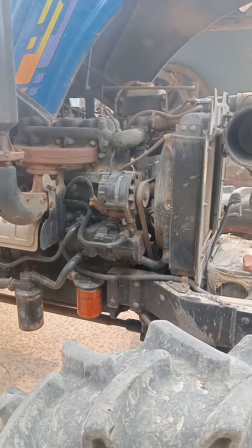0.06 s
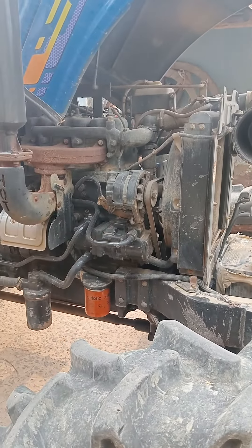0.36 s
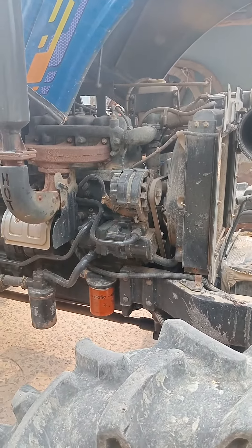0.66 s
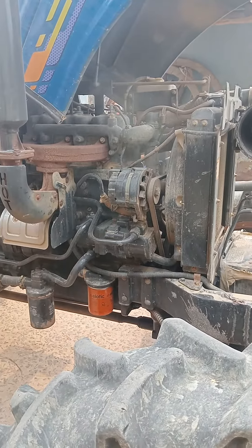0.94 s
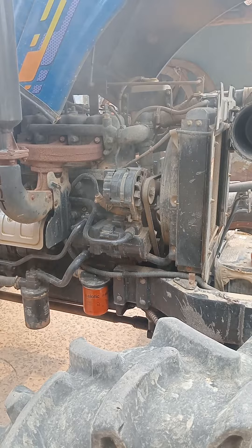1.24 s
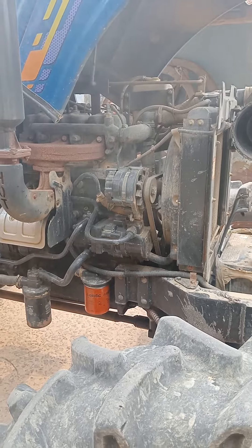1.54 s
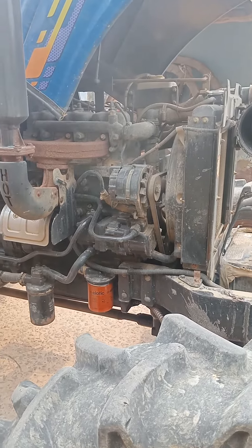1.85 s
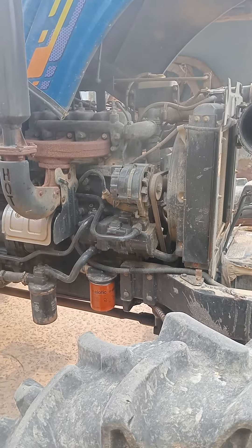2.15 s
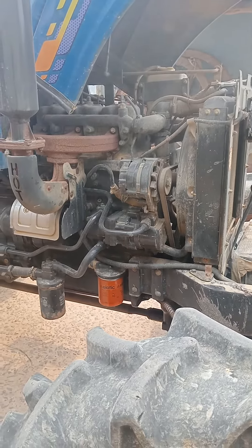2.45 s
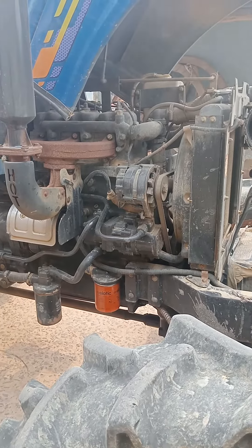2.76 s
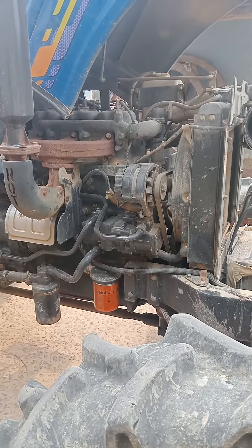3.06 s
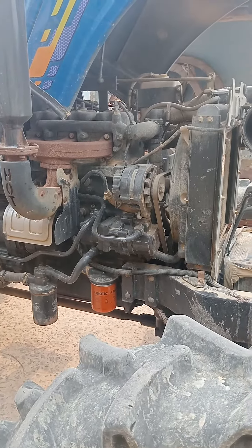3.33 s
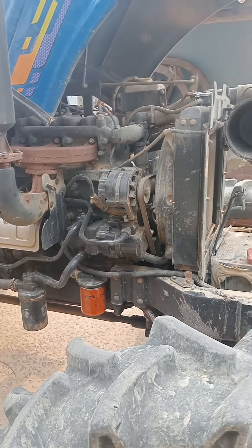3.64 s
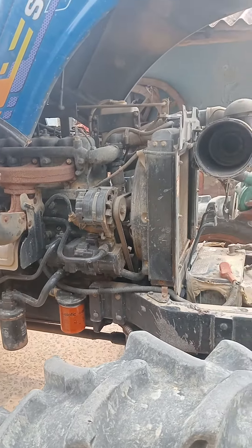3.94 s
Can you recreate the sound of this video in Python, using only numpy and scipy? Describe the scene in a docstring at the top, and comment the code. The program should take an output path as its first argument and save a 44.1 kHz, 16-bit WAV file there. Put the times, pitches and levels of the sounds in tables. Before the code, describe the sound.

Close by in the open air, an electric blower whines continuously while blowing dust off a tractor engine. The air hisses on metal and whistles hollowly in gaps, dips into a low flutter, then roars again.

```python
"""A high, steady whine over rushing air: an electric blower, flat out, dusts a tractor engine outdoors.
The ten-blade impeller makes the whine; air churning in the housing makes the rush around it.
The jet sweeps over the metal: it roars and hisses on edges, whistles hollowly in gaps, and for a
moment turns to a low, dull flutter. Short echoes off the engine comb the jet noise."""
import sys
import numpy as np
from scipy import signal
from scipy.fft import rfft, irfft
from scipy.io import wavfile
from scipy.ndimage import map_coordinates

SR = 44100
rng = np.random.default_rng(int(sys.argv[2]) if len(sys.argv) > 2 else 0)


def int16_out(signal):
    """Quantize to a 16-bit WAV file."""
    q = np.round(np.clip(np.atleast_2d(signal).T, -1, 1) * 32767)
    wavfile.write(sys.argv[1], SR, q.astype(np.int16))


N = 176400
TIME_S = np.arange(N) / SR
BIN_HZ = np.arange(N // 2 + 1) * SR / N

# Each row: time in seconds, blade-passing frequency in Hz.
BLADE_HZ = [(0, 2262), (.2, 2260), (.45, 2256), (.8, 2267), (1.25, 2257), (1.7, 2266), (2.05, 2265),
            (2.5, 2267.5), (2.8, 2264), (3.3, 2265), (3.8, 2258), (4, 2260)]
# Blade harmonics 1 to 3. Each row: time in seconds, level in dB before trim.
WHINE_DB = [(0.0, -14.5), (0.26, -18), (0.34, -17), (0.41, -19.5), (0.54, -15), (0.71, -19), (1.01, -14),
            (1.17, -15), (1.26, -13.5), (1.41, -15), (1.44, -19), (1.55, -21.5), (1.63, -16.5), (1.74, -17),
            (1.83, -14), (2.05, -16), (2.42, -15), (2.51, -18.5), (3.27, -16.5), (3.66, -18), (3.74, -19),
            (3.87, -18), (4.0, -22.5)]
SECOND_DB = [(0, -35), (.07, -30.5), (.16, -32.5), (.45, -31.5), (.57, -35), (.62, -39), (.82, -50),
             (.98, -39.5), (1.12, -35), (1.2, -45.5), (1.3, -34), (1.4, -58), (1.5, -35), (1.7, -38.5),
             (1.9, -33.5), (2.4, -45.5), (2.6, -35.5), (2.87, -29.5), (2.93, -40), (3.25, -42), (3.45, -31),
             (3.65, -38.5), (3.76, -54), (4, -46)]
THIRD_DB = [(0, -45), (.12, -48), (.22, -37), (.4, -45), (.6, -44), (.85, -54), (1.2, -56), (1.5, -45),
            (1.9, -41.5), (2.4, -52), (2.48, -41), (2.85, -34.5), (3.0, -42), (3.55, -44), (3.8, -57),
            (4, -51)]
# Each row: multiple of the shaft rate, early level in dB, late level in dB.
SHAFT_TONES = [(1, -65.5, -46), (2, -46.5, -55), (3, -49, -46.5), (4, -44, -50), (6, -46.5, -52),
               (11, -36, -41), (12, -45, -47)]
# Each row: frequency in Hz at mean speed, level in dB.
MOTOR_TONES = [(2615, -46), (2814, -50)]

def impeller(blades=10, speed_jitter=0.000594, trim_db=1.44):
    """Passing blades whine, shaken by the inflow, over weak shaft and motor tones."""
    blade_hz = curve(BLADE_HZ) * (1 + speed_jitter * wander(9.9))
    shaft_rad = 2 * np.pi * np.cumsum(blade_hz / blades) / SR
    blade_rad = blades * shaft_rad
    out = undb(curve(WHINE_DB) + trim_db + 0.56 * wander(33)) * np.sin(blade_rad)
    for harmonic, levels, overtone_trim_db in ((2, SECOND_DB, 1), (3, THIRD_DB, 0.5)):
        gain = undb(curve(levels) + overtone_trim_db + 2.15 * wander(23))
        out += gain * np.sin(harmonic * blade_rad + 0.36 * wander(30))
    # The shaft tones change balance as the blower moves.
    move_mid_s, move_length_s = 3.01, 0.7
    moved = np.clip((TIME_S - move_mid_s) / move_length_s + 0.5, 0, 1)
    for order, early_db, late_db in SHAFT_TONES:
        gain = undb(early_db + moved * (late_db - early_db) + 1.9 * wander(7.7))
        out += gain * np.sin(order * shaft_rad + 0.45 * wander(12))
    for hz, db in MOTOR_TONES:
        out += undb(db) * np.sin(blade_rad * hz / blade_hz.mean() + 0.2 * wander(6))
    return np.sqrt(2) * out  # rms to peak


# Each row: frequency in Hz, relative density in dB.
HOUSING_SPECTRUM = [(1400, -14), (1600, -13), (1800, -5.5), (2050, -3), (2170, 3), (2330, 1.5), (2480, -1),
                    (2620, -6.5), (2800, -11), (3100, -6.5)]
# Each row: time in seconds, level in dB before trim.
HOUSING_DB = [(0, -21.5), (.6, -21.5), (.8, -24), (1.38, -25.5), (1.52, -21), (1.9, -22.5), (2.3, -21),
              (2.5, -22), (3.3, -21), (3.8, -22), (4, -21.5)]

def housing():
    """Air churns in the fan housing, loudest around the blade tone."""
    return turbulence(HOUSING_SPECTRUM, HOUSING_DB, trim_db=-4.5, flicker_db=1.3)


# Each row: frequency in Hz, relative density in dB.
HISS_SPECTRUM = [(2200, -25), (2750, 1), (3150, -4.5), (3700, -2), (4150, 4.5), (4600, 3.5), (5350, 2),
                 (5850, 2), (6200, 1.5), (6600, 2), (7100, -7.5), (8000, -8)]
SIZZLE_SPECTRUM = [(6000, -40), (7000, -11), (7450, -5.5), (8000, -9.5), (8550, -1.5), (9000, -2.5),
                   (9450, 1.5), (10000, -5), (10600, -9), (11200, -14), (12500, -17), (15500, -19.5)]
FLUTTER_SPECTRUM = [(25, -30), (50, -32), (100, -18), (150, -12), (205, -2), (260, -5), (325, 6),
                    (410, -4.5), (550, 1.5), (750, -26), (1100, -35)]
ROAR_SPECTRUM = [(400, -21), (570, -17), (670, -6.5), (750, -6.5), (850, 2), (1020, -1), (1220, 2),
                 (1370, -6.5), (1500, -13.5), (1900, -10), (2600, -42)]
# Each row: time in seconds, level in dB before trim.
HISS_DB = [(0, -33), (.6, -32.5), (.8, -38), (1.35, -38.5), (1.6, -33.5), (1.85, -33), (2.1, -34),
           (2.4, -33.5), (2.85, -33), (3.2, -36), (3.6, -34.5), (4, -35)]
SIZZLE_DB = [(0, -31.5), (.65, -32), (.76, -37), (1.1, -36.5), (1.44, -36.5), (1.51, -32), (1.66, -34),
             (1.76, -31.5), (2.3, -30.5), (3.04, -30.5), (3.4, -32.5), (3.78, -33), (4, -31.5)]
FLUTTER_DB = [(0, -41), (.55, -42), (.74, -34.5), (.81, -30.5), (.96, -35.5), (1.25, -36.5), (1.55, -35.5),
              (1.7, -41), (1.9, -43), (2.4, -42), (2.7, -42), (3.2, -41.5), (3.6, -42.5), (4, -40.5)]
ROAR_DB = [(0, -29.5), (.3, -28.5), (.46, -29.5), (.56, -27.5), (.69, -25.5), (.74, -33.5), (1.1, -34),
           (1.47, -34.5), (1.51, -26), (1.65, -29), (2.1, -29.5), (2.25, -31), (2.48, -30), (2.56, -26.5),
           (3.0, -27.5), (3.25, -29.5), (3.6, -30), (4, -32.5)]

def jet():
    """The jet hits the engine: low flutter, roar, and a hiss and sizzle that echo off the metal."""
    hiss = turbulence(HISS_SPECTRUM, HISS_DB, trim_db=2.5, flicker_db=0.57)
    sizzle = turbulence(SIZZLE_SPECTRUM, SIZZLE_DB, trim_db=-2, flicker_db=0.44)
    flutter = turbulence(FLUTTER_SPECTRUM, FLUTTER_DB, trim_db=1.5, flicker_db=0.9)
    roar = turbulence(ROAR_SPECTRUM, ROAR_DB, trim_db=-1, flicker_db=1.14)
    return flutter + roar + metal_echoes(hiss + sizzle)


# Each row: start in seconds, end in seconds, centre in Hz, width in Hz, level in dB.
GAP_CROSSINGS = [(0.18, .28, 843, 90, -28), (0.213, 0.375, 654, 120, -35.5), (.22, .45, 4160, 262, -36.5),
                 (0.37, 0.598, 853, 109, -33), (0.597, .71, 1260, 200, -24.5), (0.602, .7, 1690, 203, -33),
                 (0.784, 0.897, 207, 150, -39.5), (0.806, .93, 8370, 250, -44),
                 (.93, 1.4, 9320, 260, -43.5), (.9, 1.602, 184, 55, -47), (1.084, 1.27, 576, 279.8, -35.5),
                 (1.384, 1.463, 217, 129, -37), (1.49, 1.576, 1320, 170, -26.5),
                 (1.498, 1.627, 880, 139, -28.5), (1.5, 1.732, 1610, 250, -36),
                 (1.67, 2.124, 1150, 170, -31), (1.722, 1.9, 6000, 1100, -32.5),
                 (1.948, 2.197, 6400, 305, -37.5), (2.001, 2.347, 9700, 280.2, -41),
                 (2.42, 2.65, 4260, 260, -33.5), (2.537, 3.136, 687, 180, -36),
                 (2.58, 2.92, 9030, 350, -39.5), (2.68, 3.185, 4120, 210, -33),
                 (2.966, 3.394, 9530, 330, -37), (3.0, 4.0, 3240, 300, -37),
                 (3.22, 4.0, 5850, 219.9, -38.5), (3.25, 3.55, 10420, 250.4, -42),
                 (3.727, 3.93, 1920, 90, -32.5), (2.501, 3.1, 1820, 160, -38.5),
                 (2.2, 2.496, 327, 60, -44.5), (2.55, 3.653, 1580, 300, -43)]

def gap_whistles(fade_s=0.04):
    """A gap or edge rings hollowly while the jet crosses it."""
    hz = BIN_HZ + SR / N  # one bin up avoids 0 Hz
    out = np.zeros(N)
    for start_s, end_s, centre_hz, width_hz, db in GAP_CROSSINGS:
        detuning = (hz - centre_hz ** 2 / hz) / width_hz
        ring = shaped_noise(1 / (1 + detuning ** 2))
        inside_s = np.minimum(TIME_S - start_s, end_s - TIME_S)
        out += ring * undb(db) * np.clip(inside_s / fade_s + 0.5, 0, 1)
    return out


# Each row: mean delay in ms, gain in dB.
ECHO_PATHS = [(1.35, -16), (2.9, -15), (4.7, -15), (8.3, -16), (13, -19)]

def metal_echoes(air, drift_ms=0.11):
    """Engine and bonnet reflect the air noise; the paths drift as the nozzle moves."""
    out = air.copy()
    for delay_ms, db in ECHO_PATHS:
        lag_samples = (delay_ms + drift_ms * wander(1.1)) * SR / 1000
        out += undb(db) * map_coordinates(air, [np.arange(N) - lag_samples], order=3, mode="mirror")
    return out


def turbulence(colour, levels, trim_db, flicker_db, swell_db=0.57, swell_hz=4.15):
    """Coloured air noise; each third octave swells on its own and all flicker together."""
    octave = np.log2(np.maximum(BIN_HZ, 1))
    knot_hz, knot_db = np.array(colour, float).T
    knot_octave = np.log2(knot_hz)
    skirt_db = -40 * np.abs(octave - np.clip(octave, knot_octave[0], knot_octave[-1]))
    spectrum = rfft(rng.standard_normal(N)) * undb(np.interp(octave, knot_octave, knot_db) + skirt_db)
    air = np.zeros(N)
    for centre_octave in np.arange(12, 44) / 3:
        band = np.maximum(1 - 3 * np.abs(octave - centre_octave), 0)
        swell = np.interp(TIME_S * swell_hz, np.arange(64), rng.standard_normal(64))
        air += irfft(spectrum * band, N) * undb(swell_db * swell)
    air *= undb(flicker_db * wander(30))
    return unit_rms(air) * undb(curve(levels) + trim_db)


def wander(rate_hz):
    """Smooth random motion up to about rate_hz, rms 1."""
    return shaped_noise(1 / (1 + (BIN_HZ / rate_hz) ** 4))


def shaped_noise(bin_gains):
    """Filtered white noise, rms 1."""
    return unit_rms(irfft(rfft(rng.standard_normal(N)) * bin_gains, N))


def curve(table):
    """Join (seconds, value) rows with straight lines."""
    times_s, values = np.array(table, float).T
    return np.interp(TIME_S, times_s, values)


def unit_rms(x):
    """Scale to rms 1."""
    return x / np.sqrt(np.mean(x ** 2))


def undb(db):
    """Decibels to gain."""
    return 10 ** (db / 20)


def scene():
    """Blower and jet, close by in the open air; mono."""
    return (impeller() + housing() + metal_echoes(jet()) + gap_whistles())[None]


def record(dry, cutoff_hz=15550):
    """A steep low-pass cuts the top treble."""
    return signal.sosfilt(signal.ellip(10, 0.2, 80, cutoff_hz, fs=SR, output="sos"), dry)


dry = scene()
out = record(dry)
int16_out(out)
```